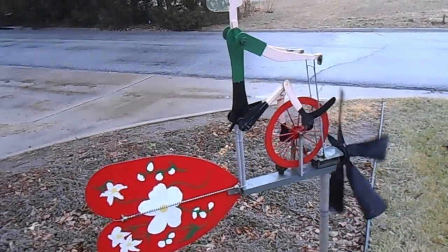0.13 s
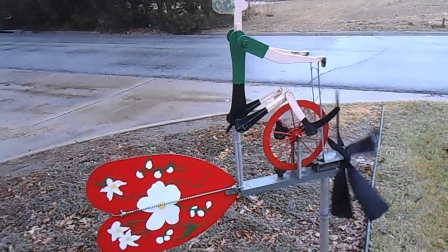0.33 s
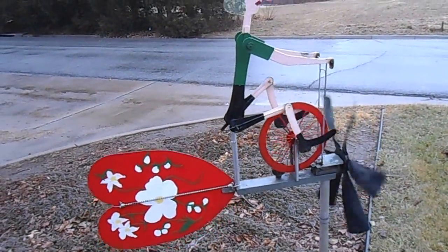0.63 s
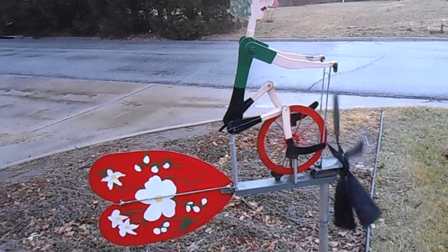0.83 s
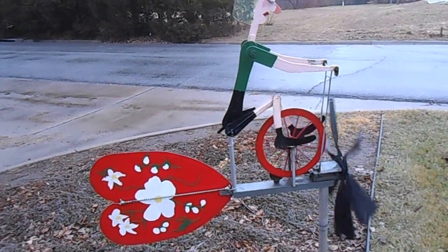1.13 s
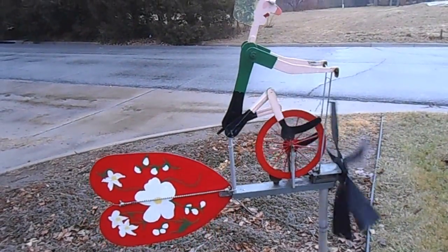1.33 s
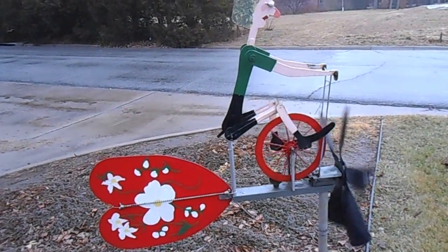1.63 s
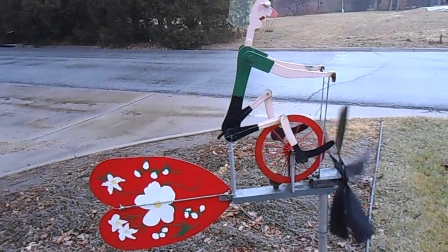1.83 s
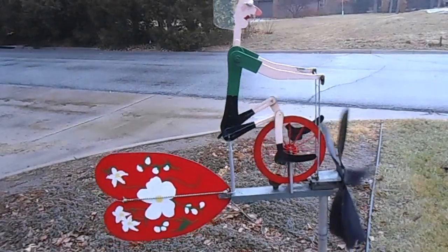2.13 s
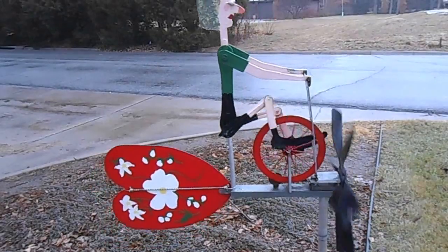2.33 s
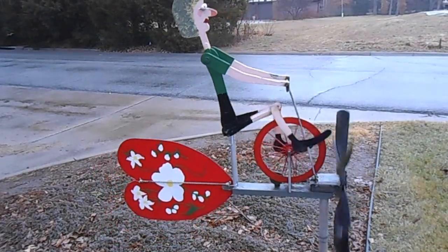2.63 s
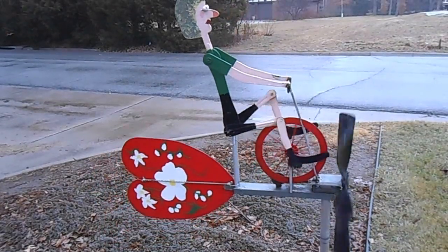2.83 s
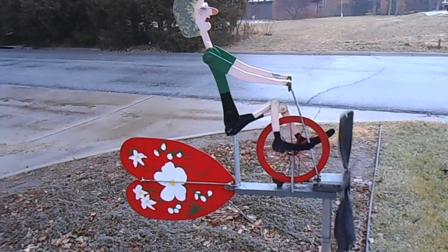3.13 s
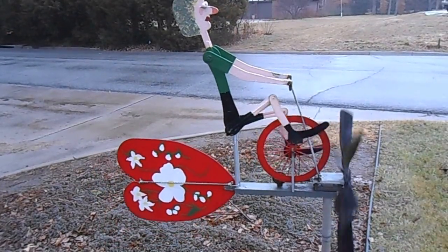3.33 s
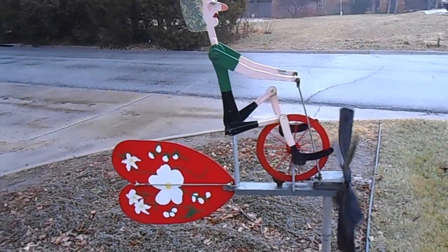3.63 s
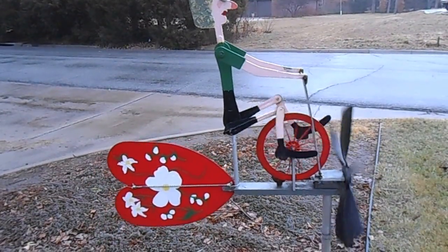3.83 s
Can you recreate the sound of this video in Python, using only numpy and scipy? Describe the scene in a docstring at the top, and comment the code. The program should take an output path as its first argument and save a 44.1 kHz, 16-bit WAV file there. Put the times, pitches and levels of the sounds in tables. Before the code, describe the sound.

Gusty wind rumbles on the microphone, with faint ticks from a spinning lawn ornament.

```python
"""Outdoors, a camera microphone stands in gusty wind beside a spinning lawn ornament.
From the start, turbulence rumbles on the microphone over a steady rush of distant wind and road.
Eddies buffet the diaphragm, a few snapping into overload, and the ornament's linkage ticks faintly.
Each strong buffet pushes the camera's gain down, and the rush swells back afterwards.
The ornament gives a thin squeak at about 1.5 s and another at 2.8 s."""
import sys
import numpy as np
from scipy import signal
from scipy.fft import rfft, irfft
from scipy.io import wavfile
from scipy.ndimage import uniform_filter1d, minimum_filter1d

SR = 44100
rng = np.random.default_rng(int(sys.argv[2]) if len(sys.argv) > 2 else 0)


def log_audio(samples):
    """Write samples as a 16-bit WAV file to the path given in sys.argv[1]."""
    # one column per channel
    frames = np.atleast_2d(samples).T
    # limit to full scale, then quantise
    limited = np.clip(frames, -1, 1)
    pcm = np.round(limited * 32767).astype(np.int16)
    wavfile.write(sys.argv[1], SR, pcm)


N = 176400
T = np.arange(N) / SR


def amp(db):
    """Decibels to gain."""
    return 10 ** (np.asarray(db) / 20)


def unit(x):
    """Scales to rms 1."""
    return x / np.sqrt(np.mean(x ** 2) + 1e-20)


def spectrum_db(points, hz):
    """Reads a spectrum's level along a log-frequency axis."""
    point_hz, db = np.transpose(points)
    return np.interp(np.log(hz + 1), np.log(point_hz), db)


def add(mix, start_s, sound):
    """Mixes a sound in at a time."""
    part = mix[max(round(start_s * SR), 0):][:len(sound)]
    part += sound[:len(part)]


def colour(x, gain):
    """Filters by a gain given as a function of frequency."""
    return irfft(rfft(x) * gain(np.fft.rfftfreq(len(x), 1 / SR) + 1e-3), len(x))


def smooth(x, span_s):
    """Moving average."""
    return uniform_filter1d(x, max(round(span_s * SR), 1))


def steady(x, span_s):
    """Holds the short-term power of a noise near 1."""
    power = smooth(smooth(x ** 2, span_s), span_s / 2)
    return x / np.sqrt(abs(power) + 1e-20)


def drift(below_hz):
    """A slow random wander of rms 1."""
    return unit(colour(rng.standard_normal(N), lambda f: 1 / (1 + (f / below_hz) ** 4)))


def rumble():
    """Low turbulence right on the microphone follows the wind pressure and flutters."""
    # Wind pressure on the microphone. Each row: time in seconds, level in dB.
    pressure = [(0, -40), (.07, -16.5), (.3, -11), (.47, -18), (.55, -22.5), (.88, -26.5), (1.1, -18),
                (1.22, -23.5), (1.47, -23.5), (1.58, -10), (1.85, -26.5), (2.17, -12.5), (2.4, -21.5),
                (2.62, -17.5), (3.03, -25), (3.4, -17), (3.55, -22.5), (3.68, -12.5), (4, -17)]
    # Spectrum of the turbulence. Each row: frequency in Hz, relative level in dB.
    spectrum = [(8, -23.5), (25, 5.5), (50, -1.5), (100, -5), (160, -11), (250, -21), (400, -34.5),
                (800, -59), (2000, -76)]
    air = colour(rng.standard_normal(N), lambda f: amp(spectrum_db(spectrum, f)))
    pressure_db = np.interp(T, *np.transpose(pressure))
    flutter_db = 6 * np.tanh(drift(below_hz=16.6))
    return steady(air, span_s=0.062) * amp(pressure_db + flutter_db)


def distant_rush():
    """A steady rush of far-off wind and road, coloured by the camera microphone's narrow resonances."""
    # Spectrum of the rush. Each row: frequency in Hz, relative level in dB.
    spectrum = [(30, 7), (300, 3), (550, -1), (820, 1.5), (1200, -4), (1550, -6.5), (2300, -8), (2470, -13),
                (3000, -15.5), (3900, -19), (4500, -22.5), (6400, -24.5), (8000, -20), (9800, -20),
                (10600, -25.5), (11200, -28)]
    # Resonances of the camera microphone. Each row: centre in Hz, width in Hz, lift in dB.
    mic_resonances = [(1733, 71, 8), (2121, 89, 8.5), (2235, 74, 4), (3054, 52, 4), (3360, 56, 4.5),
                      (8530, 130, 3), (9100, 140, 5), (9780, 270, 5.5)]

    def gain(f):
        lift_db = sum(db / (1 + (2 * (f - hz) / width) ** 2) for hz, width, db in mic_resonances)
        return amp(spectrum_db(spectrum, f) + lift_db)
    return unit(colour(rng.standard_normal(N), gain)) * amp(-29.5)


def buffets():
    """Each eddy shakes the diaphragm for a few uneven cycles; smaller eddies reach higher."""
    # Eddies striking the microphone. Each row: centre in seconds, half-length in seconds,
    # level in dB, lower edge in Hz, upper edge in Hz.
    eddies = [(0.085, 0.064, -22, 36, 205), (.130, 0.029, -8.5, 72, 236), (0.187, 0.024, -6.5, 90, 228),
              (0.207, 0.019, -11, 150, 564), (0.276, 0.022, -5.5, 70, 332), (.358, 0.039, -9, 114, 440),
              (.402, 0.024, -6, 114, 483), (.47, 0.027, -3.5, 150, 212), (0.541, 0.055, -18.5, 47, 123),
              (1.069, 0.023, -16, 23, 65), (1.136, 0.021, -12.5, 39, 158), (1.301, 0.016, -4, 52, 150),
              (1.354, 0.035, -9, 82, 155), (1.529, 0.014, -9, 62, 217), (1.572, 0.038, -1.5, 47, 201),
              (1.628, 0.037, -4, 120, 247), (1.694, .04, -3.5, 65, 362), (1.757, 0.041, -12, 50, 172),
              (2.1, 0.023, -10, 107, 385), (2.128, 0.021, -6.5, 140, 171), (2.153, .01, 1.5, 135, 614),
              (2.193, 0.029, 3.5, 123, 391), (2.285, 0.017, -8, 51, 177), (2.334, 0.029, -8.5, 100, 226),
              (2.422, .025, -15, 100, 235), (2.516, .025, -18.5, 74, 244), (2.558, 0.034, -10.5, 40, 106),
              (2.592, 0.014, 0, 78, 373), (2.62, 0.015, -5, 67, 365), (2.689, 0.017, -14, 28, 107),
              (2.846, 0.029, -9.5, 29, 187), (2.898, 0.035, -11.5, 61, 390), (2.97, 0.021, -16.5, 61, 233),
              (3.187, .013, -15.5, 110, 503), (3.336, 0.034, -20, 80, 230), (3.378, .035, -11, 44, 152),
              (3.444, 0.033, -10.5, 77, 199), (3.622, 0.026, -14.5, 110, 240), (3.662, .03, -9, 16, 55.5),
              (3.693, 0.014, -2, 92, 190), (3.828, 0.024, -9, 150, 305), (3.865, 0.041, -12, 80, 220),
              (3.925, 0.045, -12.5, 36, 150)]
    out, size = np.zeros(N), 2 ** 13
    t = (np.arange(size) - size // 2) / SR
    for centre_s, half_s, db, low_hz, high_hz in eddies:
        def gain(f):
            return 1 / f / np.hypot(1, (f / high_hz) ** 3.15) / np.hypot(1, (low_hz / f) ** 2)
        air = colour(rng.standard_normal(size), gain)
        swell = np.cos(np.pi / 2 * np.clip(t / half_s, -1, 1)) ** 2
        eddy = steady(air, span_s=0.014) * swell
        eddy *= amp(db) * np.linalg.norm(swell) / np.linalg.norm(eddy)
        out += np.interp(T, centre_s + t, eddy, left=0, right=0)
    return out


def overload_snaps():
    """Sharp one-sided steps where the microphone overloads at the crests of a few buffets."""
    # Each row: start in seconds, peak in dB.
    snaps = [(0.1306, -13), (.467, -17), (2.1385, -10.5), (2.1506, -9), (2.5915, -12)]
    out, decay_s = np.zeros(N), 0.00006
    for start_s, db in snaps:
        add(out, start_s, amp(db) * np.exp(-T[:2 ** 8] / decay_s))
    return out


def linkage_ticks():
    """Near the microphone, the ornament's linkage knocks: tiny dry bursts of high noise."""
    # Each row: start in seconds, peak in dB, centre in Hz, width in octaves.
    knocks = [(.1832, -17.5, 7000, .5), (0.842, -21.5, 6800, .22), (1.256, -27, 6500, 0.99),
              (1.849, -20, 8500, 0.33), (2.1103, -31, 6500, 0.43), (2.3426, -25, 5500, 0.39),
              (3.0132, -23, 6300, 0.87), (3.081, -26, 5000, .45), (3.7284, -18.5, 9700, 0.39)]
    out, t, decay_s = np.zeros(N), T[:2 ** 10], 0.00066
    for start_s, db, hz, octaves in knocks:
        noise = rng.standard_normal(len(t))
        grit = colour(noise, lambda f: np.exp(-0.5 * (np.log2(f / hz) / octaves) ** 2))
        tick = grit * np.exp(-t / decay_s)
        add(out, start_s, amp(db) * tick / abs(tick).max())
    return out


def ornament_squeaks():
    """The turning ornament squeaks: a thin, slightly rough tone that shoots up and levels off."""
    # Each row: start in seconds, length in seconds, peak in dB.
    squeaks = [(1.464, 0.021, -42), (2.790, .026, -36.5)]
    from_hz, to_hz, glide_s, roughness = 6200, 8450, 0.0066, 0.015
    out = np.zeros(N)
    for start_s, length_s, db in squeaks:
        t = T[:round(length_s * SR)]
        glide_hz = to_hz + (from_hz - to_hz) * np.exp(-t / glide_s)
        jitter = unit(uniform_filter1d(rng.standard_normal(2 ** 12), size=20))[:len(t)]
        phase = 2 * np.pi * np.cumsum(glide_hz * (1 + roughness * jitter)) / SR
        swell = np.sin(np.pi * np.sqrt(t / length_s))
        add(out, start_s, amp(db) * swell * np.sin(phase))
    return out


def camera_gain(sound):
    """The camera's gain control drops quickly on loud sound, holds, then recovers slowly."""
    limit_db, lag_s, attack_s, hold_s, recover_s = -12.5, 0.0019, 0.0061, 0.11, 0.32
    sensed = colour(sound, lambda f: 1 / np.hypot(1, (58.3 / f) ** 2))  # deaf to the deepest bass
    level_db = 10 * np.log10(abs(smooth(sensed ** 2, span_s=0.01)) + 1e-12)
    over_db = np.maximum(level_db - limit_db, 1e-6)
    half_hold = round(hold_s * SR / 2)
    held_db = -minimum_filter1d(-over_db, 2 * half_hold + 1, origin=half_hold, mode="nearest")
    # Each cut dies away exponentially until a deeper one takes over.
    cut_db = np.exp(np.maximum.accumulate(np.log(held_db) + T / recover_s) - T / recover_s)
    late_cut_db = np.interp(T - lag_s, T, cut_db)
    pole = np.exp(-1 / (attack_s * SR))
    return amp(-signal.lfilter([1 - pole], [1, -pole], late_cut_db))


def scene():
    """In mono: wind on the microphone, the rush far behind and the ornament close by."""
    mix = rumble() + distant_rush() + buffets() + overload_snaps() + linkage_ticks() + ornament_squeaks()
    return mix[None]


def record(dry):
    """The camera rides its gain, rounds off the peaks and cuts the highest treble."""
    ceiling, edge_hz = 0.74, 10950
    ducked = dry * camera_gain(dry[0])
    limited = ceiling * np.tanh(ducked / ceiling)
    lowpass = signal.firwin(161, edge_hz, window=("kaiser", 9), fs=SR)
    return signal.oaconvolve(limited, lowpass[None], "same")


dry = scene()
out = record(dry)
log_audio(out)
```